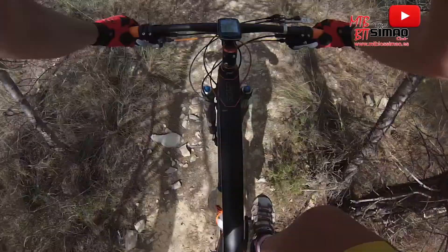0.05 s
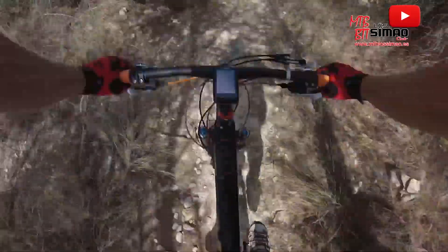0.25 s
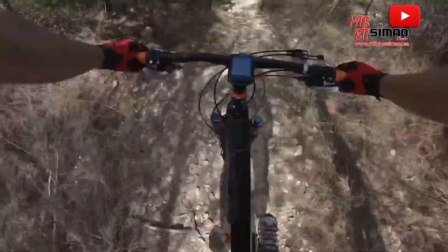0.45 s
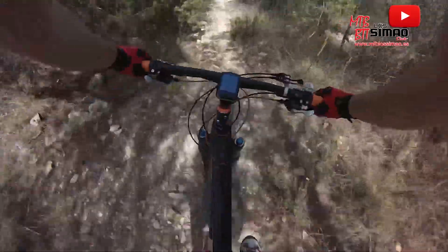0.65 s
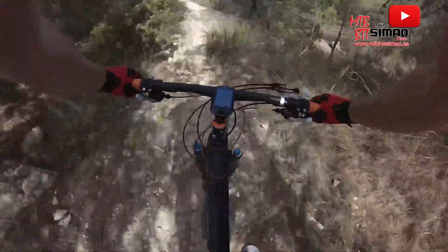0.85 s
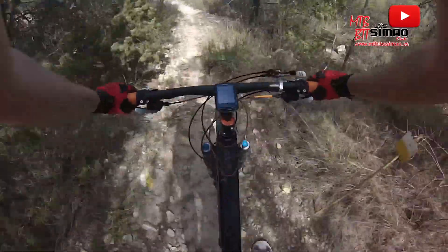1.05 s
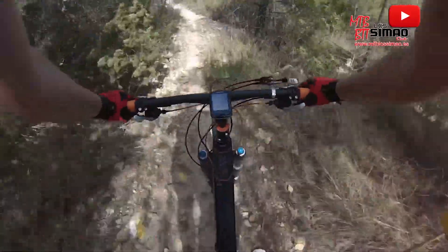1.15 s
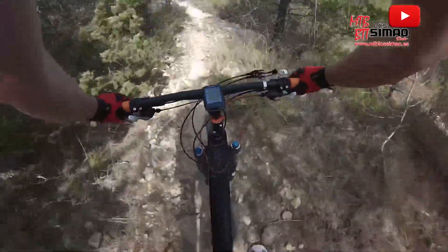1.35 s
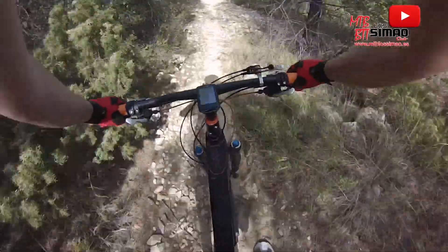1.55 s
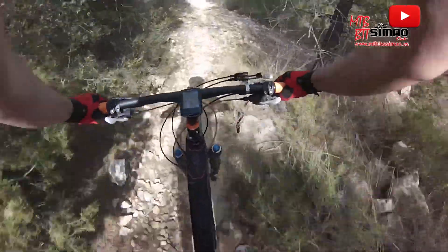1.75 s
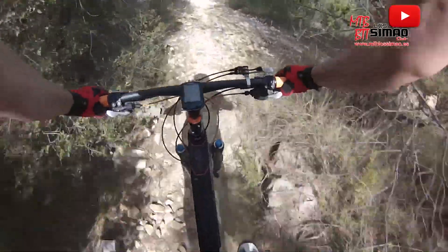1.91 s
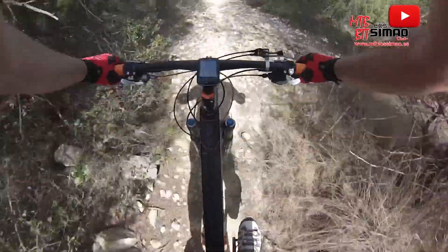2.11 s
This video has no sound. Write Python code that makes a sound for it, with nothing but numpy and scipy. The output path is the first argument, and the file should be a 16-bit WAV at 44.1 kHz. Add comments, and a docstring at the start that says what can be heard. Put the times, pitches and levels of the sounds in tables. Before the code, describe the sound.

Mountain bike tyres crackle quietly over dirt and gravel outdoors, heard through a closed camera case on the rider's chest; low thumps, a sharp rattling clack early on, then calmer rolling with a few more jolts.

```python
"""Mountain bike tyres roll down a rocky dirt trail, heard through the closed case of a camera on the chest.
The tyres are a crackle of tiny grains, louder and sandier in gravel patches; loose stones click
and scuff, and pebbles snap. Bumps thump the camera mount as short dying swings, a run of hard contacts
rings the bike's modes, and a brake sings faintly. Filtered noise makes the drone, rumble and hiss below."""
import sys
import numpy as np
from scipy import signal
from scipy.fft import rfft, irfft, next_fast_len
from scipy.io import wavfile

SR = 44100
rng = np.random.default_rng(int(sys.argv[2]) if len(sys.argv) > 2 else 0)


def wrap_up_sound(samples):
    """Save the sound to the file named by the first command line argument, as 16-bit audio."""
    columns = np.atleast_2d(samples).T
    # keep every value between -1 and 1, then stretch to whole-number steps
    tamed = np.clip(columns, -1, 1)
    steps = np.round(tamed * 32767).astype(np.int16)
    wavfile.write(sys.argv[1], SR, steps)


N = 96005  # length in samples

# Every COLOUR table is a relative response; each row: frequency in Hz, gain in dB.
# Background hiss, steady throughout.
HISS_COLOUR = [(100,12),(600,9.5),(2500,2),(6000,-2),(9000,-6),(11000,-3.5),(13000,-8)]
HISS_DB = -79.5

# Buffeting by air and the rider's movement. Each row: time in seconds, level in dB.
BUFFET_LEVEL = [(0,-43.5),(.18,-57.5),(.33,-50.5),(.44,-50.5),(.54,-34.5),(.63,-66),(.82,-57),(1.12,-59),(1.4,-56),(1.72,-53),(1.84,-54.5),(2.08,-47.5),(2.18,-58.5)]
BUFFET_COLOUR = [(12,-2),(22,-4),(35,-7),(50,-21),(80,-20),(125,-29),(200,-51),(600,-75)]

# Rough ground droning through frame and mount. Each row: time in seconds, level in dB.
DRONE_LEVEL = [(0,-51.5),(.11,-62.5),(.19,-60),(.27,-60),(.37,-65.5),(.43,-56),(.5,-50.5),(.58,-66),(.66,-65),(.78,-63),(.9,-75.5),(1.02,-69.5),(1.14,-73),(1.33,-62),(1.45,-67),(1.64,-64.5),(1.77,-66),(1.86,-63.5),(2.04,-59.5),(2.18,-82)]
DRONE_COLOUR = [(30,-15),(80,-3.5),(125,1.5),(165,-6),(210,-16),(255,-15.5),(320,-14),(420,-24),(600,-35.5),(1200,-61.5)]

# Faint brake squeals. Each row: start in seconds, length in seconds, level in dB, pitch in Hz.
SQUEALS = [(2.093,.028,-77,5060),(2.118,0.047,-67.5,2020)]
SQUEAL_WAVER, SQUEAL_WAVER_HZ = 0.0035, 121  # spread as a fraction of pitch, speed

# Jolt levels below are drive levels, before the soft attack lowers the peak.
# Bumps shaking the camera mount. Each row: start in seconds, drive level in dB, pitch in Hz,
# decay time constant in seconds.
BUMPS = [(0.075,-28,95,0.0074),(0.103,-45.5,120,0.014),(0.225,-22,116.5,0.008),(0.4568,-32,117,0.01),(0.4659,-27,115,0.012),(0.4817,-31,128,0.022),(.581,-38.5,121,0.011),(0.998,-45.5,112.4,0.0079),(1.202,-51,146,0.0079),(1.5267,-29,126.5,0.0055),(1.63,-50.5,116,0.028),(1.921,-39,125,0.012),(1.929,-32.5,123,0.005),(2.101,-43.5,117,0.02)]
BUMP_ATTACK_S = 0.0038

# Sharper bumps knocking the camera case. Each row: start in seconds, drive level in dB.
CASE_KNOCKS = [(0.101,-48),(0.2261,-40.5),(.4865,-34),(1.5283,-45),(1.929,-54)]
CASE_HZ, CASE_DECAY_S = 308, 0.0039

# Slow heaves of rider and camera. Each row: start in seconds, drive level in dB, pitch in Hz.
HEAVES = [(0.027,-44,39),(0.067,-35,27),(0.215,-30.5,38),(0.489,-30.5,17),(.535,-33.5,25),(1.523,-27,43),(1.893,-37,31),(2.047,-37,18)]
HEAVE_ATTACK_S, HEAVE_DECAY_CYCLES = 0.0076, 0.68

# Hard parts of the bike clacking together. Each row: time in seconds, drive level in dB,
# edge in Hz above which the blow is dull.
CLACKS = [(.43678,-47,9000),(.44034,-37.5,10500),(.44106,-29,2800),(.44569,-32,10500),(.44772,-39,2600)]
# Modes of the bike. Each row: frequency in Hz, level in dB relative to the blow,
# time to fall 60 dB in seconds.
CLACK_MODES = [(308,-9.5,0.22),(358,-9.5,0.053),(694,-23.5,0.083),(946,-25,0.14),(1143,-15.5,0.068),(1426,-29,0.077),(1550,-22,0.057),(2065,-3,0.026),(2360,-3.5,0.019),(2582,1,0.022),(3030,-8,0.021),(3260,-10.5,0.026),(4780,-13,0.014),(7420,-15,0.0053)]
CRACK_DB, CRACK_DECAY_S = -7, 0.0047  # crack noise: level relative to the blow, time constant
CRACK_COLOUR = [(200,-14.5),(450,10.5),(600,-8.5),(1300,1.5),(2000,18),(3800,3.5),(4400,-10),(5400,0),(6800,-12),(8200,-10),(9200,-26),(11000,-22),(13000,-29)]

# Pebbles snapping together. Each row: start in seconds, drive level in dB, pitch in Hz.
PEBBLES = [(.184,-49.5,1590),(0.4643,-48,2300),(0.4763,-40,1470),(0.5911,-36.5,1330),(0.7096,-45.5,1970),(.7112,-47,1540),(1.6445,-44,2200),(1.6737,-45,2470),(2.004,-41,2250),(2.0056,-42.5,1370),(2.0148,-42.5,2160)]
PEBBLE_ATTACK_S, PEBBLE_DECAY_S = 0.00057, 0.001

# Stones knocked and scuffed by the tyres. Each row: start in seconds, length in seconds,
# drive level in dB, ringing edge in Hz above which the stone is dull.
STONES = [(0.146,0.0048,-62,8000),(0.183,0.003,-62.5,1620),(0.2259,0.0042,-59,2880),(0.2596,0.0043,-52,3600),(0.2663,0.0045,-52,3570),(0.2738,0.0053,-57,4370),(0.282,0.0067,-57,3220),(0.3235,0.0084,-53,6060),(0.3277,0.0072,-52,2150),(0.333,0.0034,-55.5,2850),(0.486,0.0092,-57,1450),(0.766,0.0036,-65,4750),(1.2594,0.008,-66,2490),(1.471,0.013,-63.5,2660),(1.736,0.0074,-66,5500)]
STONE_COLOUR = [(200,-15),(350,-9),(550,-13.5),(900,-8),(1180,2),(1300,-4.5),(1450,4.5),(1730,-16.5),(2050,-9),(2400,0),(2750,-13.5),(3100,-11),(3900,-11.5),(4500,-17.5),(5400,-14.5),(6300,-19.5),(7600,-23),(9500,-30.5),(13000,-27)]
STONE_Q, STONE_CLICK_DB = 1.36, 15  # sharpness of the edge, click height before the row's level
STONE_ATTACK_S, STONE_RELEASE_S = 0.0014, 0.0037

# Tyre noise on the dirt. Each row: time in seconds, level in dB before TREAD_LIFT_DB.
TREAD_LEVEL = [(0,-61),(.12,-70.5),(.2,-71.5),(.31,-67),(.42,-74.5),(.56,-64),(.64,-70),(.7,-72.5),(.82,-78),(.94,-73),(1.0,-73.5),(1.13,-77),(1.32,-72.5),(1.44,-74),(1.7,-74),(1.92,-72.5),(2.08,-69),(2.18,-77.5)]
TREAD_LIFT_DB, TREAD_FLUTTER_DB, TREAD_FLUTTER_HZ = 1, 1.5, 46
GRIT_PER_S, GRIT_SPREAD_DB = 5000, 3
# Grit as heard through the case.
GRIT_COLOUR = [(200,-5.5),(350,-2.5),(450,-11),(650,-14.5),(950,-10),(1130,-6),(1270,-0.5),(1480,0),(1620,-10.5),(1760,-16),(2030,-1.5),(2300,-1.5),(2570,-2.5),(2760,-13),(3500,-20),(3900,-14),(4400,-25.5),(5030,-14),(6200,-33.5),(7500,-25.5),(9400,-43.5),(11000,-38),(13000,-40)]

# Tyres biting into patches of gravel. Each row: start in seconds, length in seconds, level in dB
# before the flutter, level of the sandy top in dB relative to the patch.
CRUNCHES = [(0.039,0.019,-64.5,2),(0.067,0.046,-58.5,-18.5),(0.347,0.071,-64.5,-11.5),(0.409,0.046,-54,-19),(0.445,0.053,-55.5,-39),(0.53,0.03,-64.5,-7),(0.727,0.049,-66,-33),(1.07,0.028,-65.5,-13),(1.142,0.069,-70.5,-17),(1.25,0.054,-63.5,-32),(1.336,0.057,-68.5,-25),(1.52,0.071,-62,-14.5),(1.587,0.063,-60,-25),(1.642,0.041,-59.5,-24),(1.79,0.093,-73.5,-2.5),(1.906,0.041,-73.5,-4.5),(1.972,0.081,-67,-10.5),(2.091,0.084,-71.5,-7.5)]
CRUNCH_ATTACK_S, CRUNCH_RELEASE_S = 0.021, 0.011
# Fine sand thrown up from the patches.
SAND_COLOUR = [(1500,-28.5),(3000,-0.5),(3900,-1.5),(4400,-5),(5100,-0.5),(6300,-10.5),(7600,-9),(9300,-18),(11000,-12),(13000,-20)]

TOP_CUT_HZ = 12900


def from_db(db):
    """Decibels to gain."""
    return 10 ** (np.asarray(db) / 20)


def rms_one(x):
    """Scale to unit rms."""
    return x / np.sqrt(np.mean(x ** 2) + 1e-20)


def since(s=0):
    """Seconds since a moment, zero before it."""
    return np.maximum(np.arange(N) / SR - s, 0)


def in_time(rows):
    """Join (seconds, value) points by straight lines."""
    return np.interp(since(), *np.transpose(rows))


def noise():
    """White noise of unit power."""
    return rng.standard_normal(N)


def drift(hz):
    """Smoothed random wander of unit rms; higher hz wanders faster."""
    r = np.exp(-2 * np.pi * hz / SR)
    wander = signal.lfilter([1], [1, -2 * r, r * r], rng.standard_normal(2 * N))
    return rms_one(wander[N:])  # drop the settling half


def colour(x, points):
    """Minimum-phase filter through (Hz, dB) points, scaled so white noise keeps its power."""
    hz, db = np.transpose(points)
    size = 2 * next_fast_len(N)
    bin_hz = np.arange(size // 2 + 1) * SR / size
    gain = rms_one(from_db(np.interp(np.log(bin_hz + 1), np.log(hz), db)))
    # folding the cepstrum forward in time makes the filter causal
    cepstrum = irfft(np.log(gain))
    cepstrum[1:size // 2] *= 2
    cepstrum[size // 2 + 1:] = 0
    return irfft(rfft(x, size) * np.exp(rfft(cepstrum)))[:N]


def click(s):
    """One-sample click of height 1."""
    return signal.unit_impulse(N, int(s * SR))


def dull(x, hz):
    """Gentle low-pass."""
    return signal.sosfilt(signal.butter(2, hz, fs=SR, output="sos"), x + 1e-18)


def resonant_dull(x, hz):
    """Low-pass with a ringing peak at its edge."""
    warped_rate = .5 / np.tan(np.pi * hz / SR)  # puts the edge exactly at hz
    b, a = signal.bilinear([1], [1, 1 / STONE_Q, 1], fs=warped_rate)
    return signal.lfilter(b, a, x + 1e-18)


def ring(x, hz, t60):
    """Resonator: a unit click starts a dying sine of height 1."""
    r = np.exp(-np.log(1000) / (t60 * SR))
    w = 2 * np.pi * hz / SR
    return signal.lfilter([0, np.sin(w)], [1, -2 * r * np.cos(w), r * r], x + 1e-18)


def grains(per_s, spread_db):
    """Random tiny clicks of uneven size and either sign, at unit rms."""
    sizes = from_db(spread_db * np.minimum(rng.exponential(1, N), 4))
    signs = rng.choice([-1, 1], N)
    struck = rng.random(N) < per_s / SR
    return rms_one(sizes * signs * struck)


def swell(s, length, attack, release):
    """Straight attack, hold, then an exponential release that has fallen to 1/e at the given length."""
    rise = np.minimum(since(s) / attack, 1)
    return rise * np.exp(-since(s + length - release) / release)


def jolt(s, hz, attack, decay):
    """A softly started, quickly dying swing."""
    t = since(s)
    return -np.sin(2 * np.pi * hz * t) * (1 - np.exp(-t / attack)) * np.exp(-t / decay)


def hiss():
    """Even noise, strongest in the lows."""
    return from_db(HISS_DB) * colour(noise(), HISS_COLOUR)


def rumble():
    """Air and body movement buffet as very low noise of changing level."""
    return from_db(in_time(BUFFET_LEVEL)) * rms_one(colour(noise(), BUFFET_COLOUR))


def drone():
    """Rough ground carried through frame and mount is low noise of changing level."""
    return from_db(in_time(DRONE_LEVEL)) * rms_one(colour(noise(), DRONE_COLOUR))


def brake():
    """Rubbing makes the disc sing; each squeal is a single wavering mode."""
    turn = 2 * np.pi * np.cumsum(1 + SQUEAL_WAVER * drift(SQUEAL_WAVER_HZ)) / SR  # phase per Hz
    squeals = np.zeros(N)
    for s, length, db, hz in SQUEALS:
        squeals += from_db(db) * swell(s, length, length / 2, length / 4) * np.sin(hz * turn)
    return squeals


def bumps():
    """Bumps thump the mount and knock the case as dying swings; the camera heaves more slowly."""
    shaken = np.zeros(N)
    for s, db, hz, decay in BUMPS:
        shaken += from_db(db) * jolt(s, hz, BUMP_ATTACK_S, decay)
    for s, db in CASE_KNOCKS:
        shaken += from_db(db) * jolt(s, CASE_HZ, BUMP_ATTACK_S, CASE_DECAY_S)
    for s, db, hz in HEAVES:
        shaken += from_db(db) * jolt(s, hz, HEAVE_ATTACK_S, HEAVE_DECAY_CYCLES / hz)
    return shaken


def clack():
    """A quick run of hard contacts, each with a brief noisy crack, rings the bike's modes."""
    blows, cracks = np.zeros(N), np.zeros(N)
    for s, db, hz in CLACKS:
        blows += from_db(db) * dull(click(s), hz)
        burst = noise() * (since(s) > 0) * np.exp(-since(s) / CRACK_DECAY_S)
        cracks += from_db(db + CRACK_DB) * dull(burst, hz)
    ringing = np.zeros(N)
    for k, (hz, db, t60) in enumerate(CLACK_MODES):
        ringing += (-1) ** k * from_db(db) * ring(blows, hz, t60)  # neighbours in opposite sign
    return ringing + colour(cracks, CRACK_COLOUR)


def pebbles():
    """Each single hard contact is a swing that dies within a few cycles."""
    return sum(from_db(db) * jolt(s, hz, PEBBLE_ATTACK_S, PEBBLE_DECAY_S) for s, db, hz in PEBBLES)


def stones():
    """Each loose stone gives a click and a short gritty scuff with a pitch of its own."""
    grit = grains(per_s=6000, spread_db=5.0)
    knocks = np.zeros(N)
    for s, length, db, hz in STONES:
        knock = from_db(STONE_CLICK_DB) * click(s)
        scuff = grit * swell(s, length, STONE_ATTACK_S, STONE_RELEASE_S)
        knocks += from_db(db) * resonant_dull(knock + scuff, hz)
    return colour(knocks, STONE_COLOUR)


def tyres():
    """Grit crackles under the tread, louder in each patch of gravel, where sand sprays too."""
    rolling = from_db(in_time(TREAD_LEVEL) + TREAD_LIFT_DB)
    gravel, spray = np.zeros(N), np.zeros(N)
    for s, length, db, sand_db in CRUNCHES:
        patch = from_db(db) * swell(s, length, CRUNCH_ATTACK_S, CRUNCH_RELEASE_S)
        gravel += patch
        spray += patch * from_db(sand_db)
    flutter = from_db(TREAD_FLUTTER_DB * drift(TREAD_FLUTTER_HZ))
    level = np.hypot(rolling, gravel) * flutter  # rolling and gravel add in power
    grit = colour(level * grains(GRIT_PER_S, GRIT_SPREAD_DB), GRIT_COLOUR)
    sand = colour(spray * grains(per_s=4800, spread_db=5.0), SAND_COLOUR)
    return grit + sand


def scene():
    """Tyres, stones, pebbles, clack, bumps and brake over drone, rumble and hiss."""
    background = rumble() + hiss() + drone()
    ground = tyres() + stones() + pebbles()
    bike = clack() + bumps() + brake()
    return (background + ground + bike)[None]  # one channel


def record(dry):
    """A steep low-pass cuts off the top of the treble."""
    steep = signal.ellip(10, .1, 70, TOP_CUT_HZ, fs=SR, output="sos")  # ripple, rejection in dB
    return signal.sosfilt(steep, dry)


dry = scene()
out = record(dry)
wrap_up_sound(out)
```